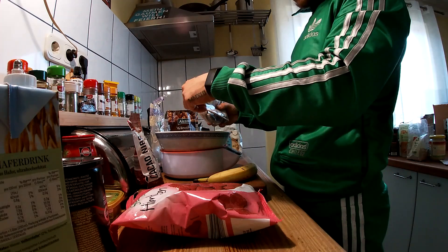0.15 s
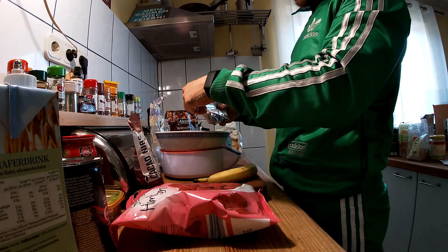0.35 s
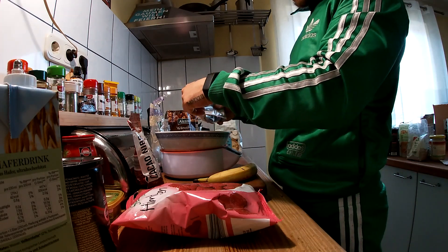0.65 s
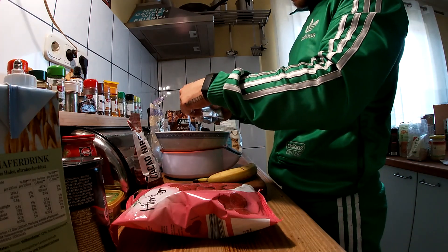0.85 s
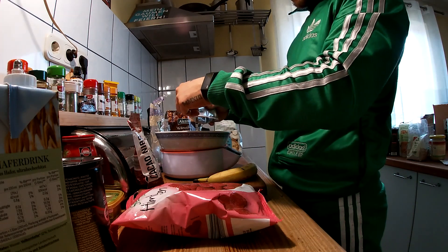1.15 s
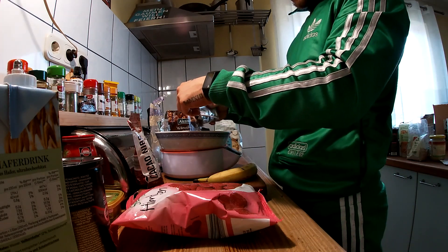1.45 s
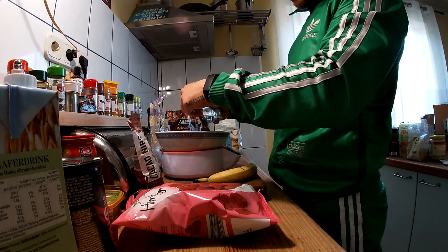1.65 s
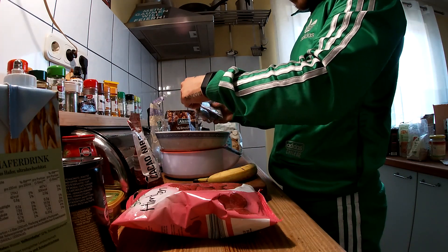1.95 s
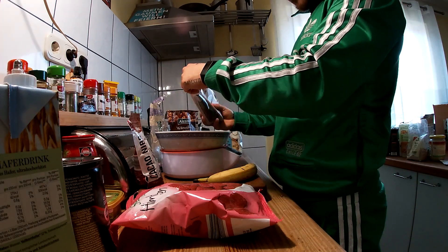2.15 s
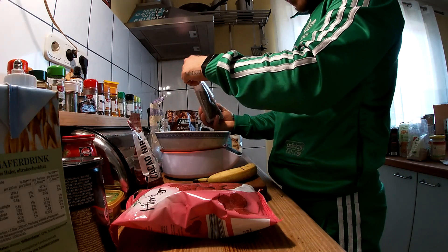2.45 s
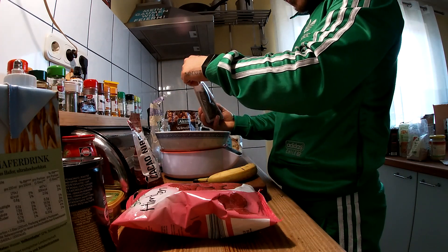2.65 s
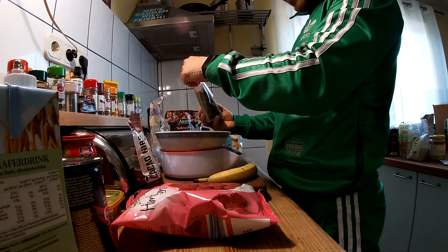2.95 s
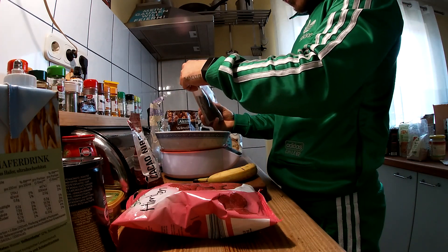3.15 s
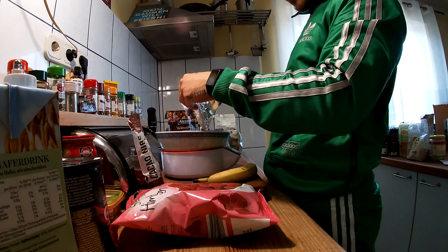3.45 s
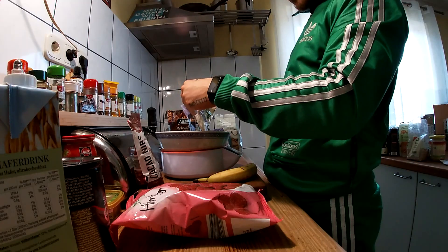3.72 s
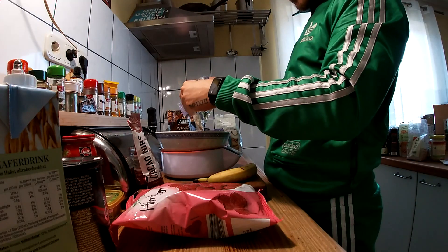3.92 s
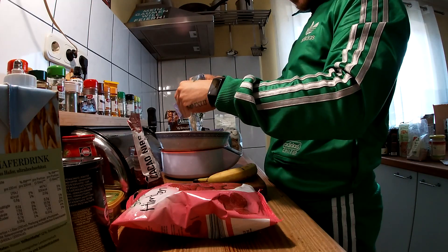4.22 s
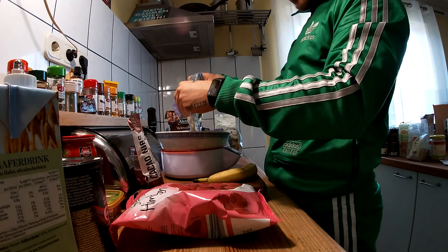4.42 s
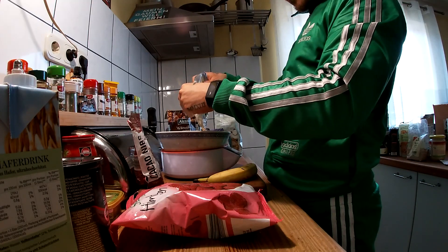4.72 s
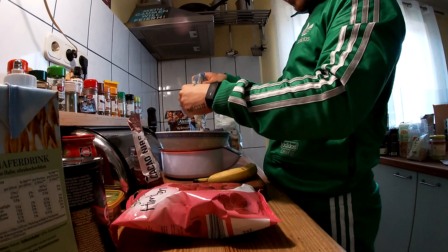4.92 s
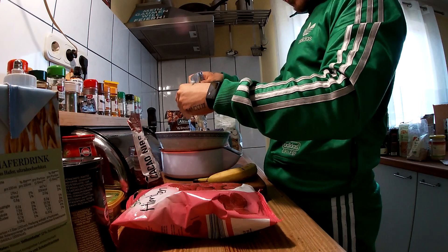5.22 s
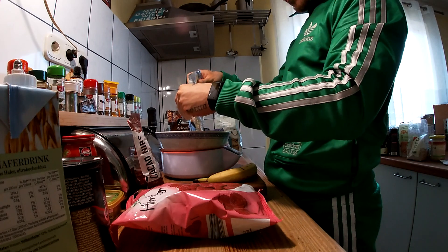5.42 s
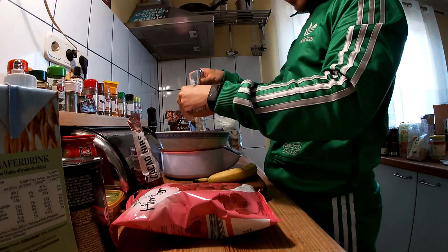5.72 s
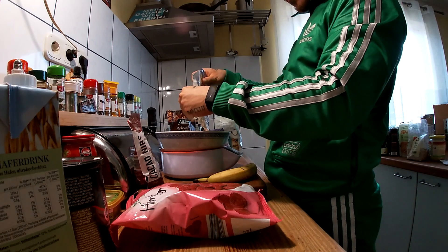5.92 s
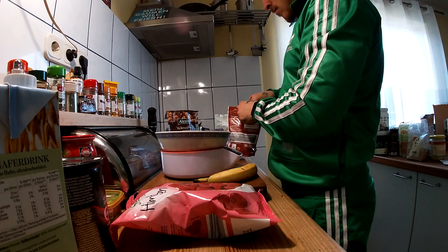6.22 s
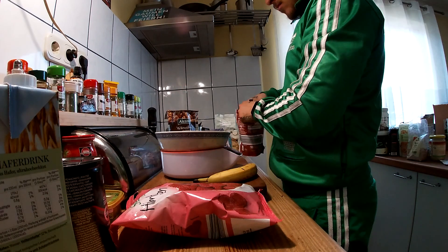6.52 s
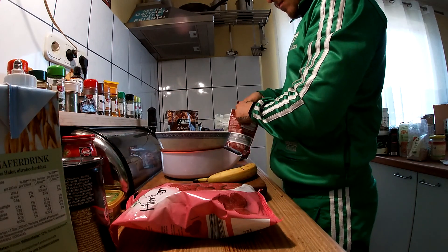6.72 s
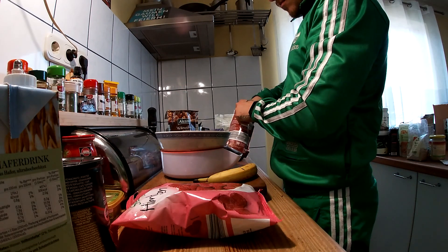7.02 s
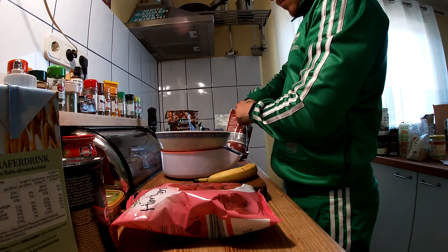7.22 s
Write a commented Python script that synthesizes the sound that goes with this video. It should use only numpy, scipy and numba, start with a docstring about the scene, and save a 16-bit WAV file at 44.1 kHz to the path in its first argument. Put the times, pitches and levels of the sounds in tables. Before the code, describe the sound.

Grains pour in rattling rushes with light packet knocks, a brief silent gap midway, then sharp snapping and crinkling of a stiff bag.

```python
"""Dry oats, seeds and nuts slide out of thin packets into a bowl in a small tiled kitchen; at the end a stiff
film bag is worked open close to a single microphone. Grains and film are clouds of short random rings; each snap
is an abrupt crack and a run of ticks; fingers knock packet and worktop, whose modes ring; scuffs and thuds are
low rings; the room is a hush, hard echoes and a tail. An edit leaves a tenth of a second of silence in the middle."""
import sys
import numpy as np
from scipy import signal
from scipy.fft import rfft, irfft
from scipy.io import wavfile
from numba import njit

SR = 44100
rng = np.random.default_rng(int(sys.argv[2]) if len(sys.argv) > 2 else 0)


def voltage_ratio(level):
    """Linear amplitude factor for a level in decibels (scalar or array-like)."""
    return 10 ** (np.asarray(level, float) / 20)


def persist_wave(psi):
    """Save psi, clipped to +-1, as 16-bit WAV."""
    counts = np.round(np.clip(psi, -1, 1) * 32767).astype(np.int16)
    wavfile.write(sys.argv[1], SR, np.atleast_2d(counts).T)


N = 325017  # samples


@njit
def rings(s, hz, t60, size, count):
    """Each contact starts a decaying sine that stops once it has lost 60 dB."""
    out = np.zeros(count)
    for k in range(len(s)):
        turn = np.exp((2j * np.pi * hz[k] - np.log(1000) / t60[k]) / SR)
        z, start = size[k] + 0j, int(s[k] * SR)
        for j in range(start, min(count, start + int(t60[k] * SR))):
            out[j] += z.imag
            z *= turn
    return out


def small(x, low_hz):
    """Small things radiate little bass."""
    return signal.sosfilt(signal.butter(2, low_hz, "high", fs=SR, output="sos"), x)


def rustle(curve, sizes):
    """Random contacts of each size: many faint, a few strong; smaller pieces ring higher. One track per spot."""
    clumps_per_s, clump_db = 30, 1.36  # pieces let go in clumps, so all sizes swell and dip together
    # one piece rattles several times near its own pitch; spread is the share of the range it covers
    pieces_per_s, piece_db, piece_spread = 90, 1.5, 0.662
    s, *levels = np.transpose(curve)
    out = np.zeros((len(SPOT_SHIFT_MS), N))
    clumps = clump_db * rng.standard_normal(N // 500)
    for db, (rate, low_hz, high_hz, cycles, scatter_db, lean) in zip(levels, sizes):
        length = s[-1] - s[0]
        when, pitch, luck, side = rng.random((int(rate * length), 4)).T
        when = s[0] + when * length
        piece = (when * pieces_per_s).astype(int)
        own_pitch, own_luck = rng.random((N // 200, 2))[piece].T
        # pitches that run past the end of the range fold back
        pitch = np.abs((2 * own_pitch + piece_spread * pitch) % 2 - 1)
        hz = low_hz + (high_hz - low_hz) * pitch ** lean
        t60 = 2 * cycles / hz
        size = voltage_ratio(-scatter_db * np.log(1.003 - luck)) * np.sign(side - .5) / np.sqrt(t60)
        # a ring of size a holds the energy a^2 t60 / (4 ln 1000)
        unit = np.sqrt(rate * np.mean(size ** 2 * t60) / (4 * np.log(1000)))
        swell_db = np.interp(when * clumps_per_s, range(len(clumps)), clumps)
        level_db = np.interp(when, s, db) + 2 * piece_db * (own_luck - .5) + swell_db
        size = size * voltage_ratio(level_db) / unit
        for k in range(len(out)):
            own = [v[k::len(out)].copy() for v in (when, hz, t60, size)]
            out[k] += small(rings(*own, count=N), 0.74 * low_hz)
    return out


def swells(t, events, rise_s, fall_s):
    """Bell-shaped changes of level in dB, each with its own time scale before and after the peak."""
    s, db = np.transpose(events)[:, :, None]
    return np.sum(db * np.exp(-((t - s) / np.where(t < s, rise_s, fall_s)) ** 2), axis=0)


def sizes_db(curve, dull_db, events=None):
    """Levels of fine, middling and dull contacts from one level and the share of larger pieces."""
    s, fine_db, larger_db = np.transpose(curve)
    t = np.arange(s[0], s[-1], .002)
    fine = np.interp(t, s, fine_db)
    if events:
        fine = fine + swells(t, events, rise_s=0.018, fall_s=0.025)
    middling = fine + np.interp(t, s, larger_db)
    return np.transpose([t, fine, middling, middling + dull_db])


# the stream of grains; it dies away, and runs again after the silence, before room and microphone:
# [t/s, level of fine ticks/dB, level of larger pieces/dB over the fine]
POUR = [(0, -60, 13.5), (.05, -65.5, 8), (.056, -45.5, -7.5), (.3, -45, -7.5), (.45, -48.5, -7),
        (1.0, -49.5, -7.5), (1.3, -47.5, -12), (1.7, -46.5, -12), (1.85, -51, -25), (2.1, -63.5, -8.5),
        (2.55, -59, -7), (2.9, -70.5, -22), (3.1, -82.5, -7), (3.39, -78, -7), (3.394, -42.5, -8.5),
        (3.75, -45, -7), (3.95, -52, -4.5), (4.35, -51.5, -4.5), (4.6, -49, -5.5), (4.95, -53.5, -4.5),
        (5.4, -53.5, -4), (5.66, -47.5, -3), (6.05, -50, -3), (6.135, -62, 10.5), (6.2, -101, -2)]
# shakes of the packet raise, or now and then lower, the level of the grains: [t/s, level change/dB]
PACKET_SHAKES = [(.125, 6.5), (.335, 6), (.485, 3.5), (.66, 4.5), (.73, 2.5), (.83, 5.5), (0.904, 8),
                 (1.0, 5), (1.07, 1), (1.23, 7), (1.55, 0), (1.62, -2), (1.7, 2), (2.36, 12), (2.45, 6),
                 (2.62, 5), (2.754, 19.5), (2.965, 7), (3.258, 15.5), (3.57, 1), (3.81, 1), (4.005, 4),
                 (4.08, 3.5), (4.23, 9.5), (4.415, 3.5), (5.1, 4.5), (5.28, 4.5), (5.46, 2.5)]
# a row each for fine, middling and dull contacts: [contacts per s, lowest f/Hz, highest f/Hz,
# cycles of ring to the 30 dB point, mean scatter/dB, lean to low pitch (exponent)]
GRAIN_SIZES = [(3025, 2833, 10020, 2.6, 2.5, 0.96), (1472, 1086, 3910, 3.84, 2.5, 0.53),
               (398, 129, 918, 7.8, 3, 1.526)]


def grains():
    """Oats, seeds and nuts tick as they slide and land, over dull bumps of the larger pieces."""
    return rustle(sizes_db(POUR, dull_db=-14.5, events=PACKET_SHAKES), GRAIN_SIZES)


def colour(x, points):
    """Causal filter through (f/Hz, level/dB) points, from the cepstrum of the log gain."""
    hz, db = np.transpose(points)
    f = np.maximum(np.fft.rfftfreq(4096, 1 / SR), 1)
    cepstrum = irfft(np.interp(np.log(f), np.log(hz), db) * np.log(10) / 20)
    # folding the later half onto the first leaves no response ahead of the sound
    cepstrum[1:len(cepstrum) // 2] *= 2
    cepstrum[len(cepstrum) // 2 + 1:] = 0
    return signal.fftconvolve(x, irfft(np.exp(rfft(cepstrum))))[:len(x)]


# spectrum of the hush, of which only the shape counts: [f/Hz, relative level/dB]
HUSH = [(12, -41.5), (20, 2.5), (53, -24), (172, -6), (234, -6.5), (277, -17), (301, -10), (377, -7.5),
        (558, -15.5), (949, -9), (1090, -16.5), (7950, -21.5), (16000, -63.5)]


def kitchen():
    """Faint steady hush of the room and the microphone, as coloured noise."""
    hush = colour(rng.standard_normal(N), HUSH)
    return voltage_ratio(-68.5) * hush / np.std(hush)


# blows on packet, bowl and worktop, and short 1900 Hz rings of the bag as it is gripped; a blow that rings
# at several pitches has several rows; levels come before modes, room and microphone:
# [t/s, level/dB, f that rings most/Hz, level lost per octave away from it/dB]
BLOWS = [(.024, -49.5, 900, 5.5), (.035, -50, 800, 6), (.09, -48.5, 170, 3), (.206, -46, 640, 3.5),
         (.226, -40, 400, 15), (.269, -45, 200, 9), (.516, -52, 380, 14), (.69, -58, 800, 4.5),
         (.703, -46.5, 380, 13), (.957, -52, 810, 3.5), (1.047, -45.5, 400, 8.5), (1.227, -51, 400, 9.5),
         (1.398, -48.5, 373, 10.5), (1.575, -53, 373, 12), (1.707, -54, 790, 6), (1.75, -50.5, 386, 18),
         (2.239, -44.5, 420, 22), (2.239, -50.5, 850, 17), (2.24, -52, 1950, 5), (2.331, -42, 540, 13),
         (2.338, -45.5, 300, 6.5), (2.513, -61, 750, 5), (2.736, -33.5, 165, 7.5), (2.737, -41, 640, 26),
         (3.492, -47, 163, 4.5), (3.934, -51, 283, 10), (5.377, -40, 642, 48.5), (5.378, -52.5, 1320, 8.5),
         (5.602, -43.5, 293, 8), (6.1, -50.5, 500, 14), (6.11, -39.5, 170.6, 14), (6.171, -37.5, 515, 17),
         (6.245, -53, 1900, 14), (6.254, -49.5, 1900, 15), (6.265, -47.5, 1900, 19), (6.279, -38, 540, 12),
         (6.2795, -44, 1920, 6), (6.296, -50, 1900, 14), (6.421, -31, 500, 9), (6.48, -26, 480, 12),
         (6.529, -29, 560, 4.5), (6.755, -33.5, 570, 11), (6.862, -27, 554, 7), (6.944, -27, 440, 14),
         (7.339, -32.5, 696, 35)]
# modes that the blows set ringing: [f/Hz, level/dB, t60/s]
MODES = [(155.7, 3.5, 0.11), (222, -3.5, 0.073), (284, -3.5, 0.11), (420, 3, 0.041), (498, 8, 0.0088),
         (629.4, 4.5, 0.057), (707, 0.5, 0.094), (840, 4, 0.053), (1300, 8.5, 0.03), (1883, 15, 0.018)]


def knocks(count):
    """The pitch of a blow decides which modes answer: those near it most, each as a few uneven rings."""
    stray, late_ms, rebound_db = 0.043, 4, 7.5  # pitch scatter, mean lateness of rebounds, loss per rebound
    s, db, near_hz, narrow_db = np.transpose(BLOWS)[:, :, None, None]
    hz, mode_db, t60 = np.transpose(MODES)
    draws = rng.standard_normal((len(BLOWS), 3, count, len(MODES)))
    detune, side, late = draws.transpose(1, 0, 2, 3)
    rebound = np.arange(count)[:, None]
    level_db = db + mode_db - narrow_db * np.abs(np.log2(hz / near_hz))
    size = voltage_ratio(level_db) * np.sign(side[:, :1]) * voltage_ratio(-rebound_db * rebound)
    when = s + late ** 2 * late_ms / 1000 * (rebound > 0)
    # the first ring strays less than the rebounds
    hz = hz * (1 + stray * detune * np.where(when > s, 1, .4))
    t60, size = t60 + 0 * when, size + 0 * when
    rung = rings(when.ravel(), hz.ravel(), t60.ravel(), size.ravel(), count=N)
    # a soft contact pushes for a moment, which rounds the start
    return signal.sosfilt(signal.butter(1, 2500, fs=SR, output="sos"), rung)


SNAP_MID_HZ = 3530  # the level of a snap applies here
# snaps of film and dropping pieces; a few rows are hard echoes 7 ms after a snap; before room and microphone:
# [t/s, level/dB, brightness/dB per octave, narrowness/dB an octave either side,
# level of the crackle that follows/dB over the snap]
SNAP_ROWS = [(0.132, -43, 14.5, -2, -10), (0.2063, -22, -1.5, 6, -18.5), (0.341, -30, 4.5, 3.5, -21),
             (0.65, -46, 9, 6.5, -24.5), (0.666, -40, 6.5, 5, -20), (.692, -46, -7, 2, -20),
             (0.817, -47, 14.5, -3, -14), (0.8845, -31, -5, 11, -25), (.957, -45, 4, 9, -25),
             (1.0463, -30.5, -2, 9, -6), (1.056, -34, 12.5, 0.5, -15), (1.2295, -44.5, 4, -5, -21),
             (1.2359, -39, 15, -4, -23), (1.469, -42, 5.5, -2, -25), (1.709, -42, 1.5, -5, -15),
             (2.24, -37.5, 4, 0, -5), (2.331, -30, 3.5, 1, -9.5), (2.4481, -43, -5, 3, -10.5),
             (2.736, -38.5, 5.5, -0.5, -1), (3.558, -37.5, 6, 4.5, -20), (3.937, -36, -4, 4, -26.5),
             (4.1999, -22, 8.5, 0.5, -10), (4.2066, -24.5, 7, 3, -15), (5.602, -43.5, -3, -1.5, -19),
             (6.1702, -42.5, -8, -1, -24), (6.242, -47.5, 0, -1, -11.5), (6.2554, -41, 2, -1, -18),
             (6.2657, -39.5, 2.5, -2, -2), (6.3142, -27, 6, 6, -10), (6.33, -25.5, 6, -0.5, -16),
             (6.3447, -27.5, 10.5, 1.5, -5.5), (6.406, -17, -0.5, 4.5, -26), (6.4294, -28, -8.5, 0, -5),
             (6.4395, -28.5, -7, 2, -15), (6.445, -19, 8, 11, -26.5), (6.452, -29, 12, 5, -21.5),
             (6.4793, -17, 5.5, -2, -7.5), (6.4862, -19, 1, 3, -12), (6.5255, -18, 5, 0.5, -11.5),
             (6.533, -25.5, -0.5, -3, -17), (6.542, -26, -2, -1, -11), (6.585, -22, 2.5, 6.5, -22),
             (6.61, -22, 2, 1.5, -8), (6.6181, -19.5, 1.5, 3.5, -4), (6.7593, -26.5, 0.5, -0.5, 0),
             (6.8234, -25, 11, 0.5, -2.5), (6.863, -19, -2.5, -1, -12.5), (6.871, -29, -6.5, 2, -17.5),
             (6.898, -35.5, -5, 1.5, -20.5), (6.943, -25, 3, -0.5, 4), (6.948, -22, 2.5, 0.5, -19),
             (6.954, -27, 6, 0, -16), (7.035, -33, -7.5, 5, -18), (7.0424, -14, -1.5, 8, -7.5),
             (7.051, -21, -6, 10, -22), (7.1314, -35.5, 1.5, 0, 11), (7.139, -26, -0.5, -0.5, -10),
             (7.208, -28.5, -2, 1, -8), (7.2145, -25, 5, 1, -12), (7.228, -19, -2, 9, -7),
             (7.233, -27, -1, 3, -11), (7.239, -20.5, 2, 2.5, -6), (7.253, -31, 9, -0.5, -18),
             (7.281, -29, -5, 1.5, 4.5), (7.295, -31, -4, 1, -10), (7.3595, -28, 5.5, -0.5, -22)]


def cracks(count, steps, ms, cycles, step_db):
    """The sharp start of a snap: a few abrupt steps, each striking a whole set of short rings at once."""
    s, level_db, bright_db, narrow_db = np.transpose(SNAP_ROWS)[:-1, :, None, None]
    late, side = rng.random((len(SNAP_ROWS), 2, steps, 1)).transpose(1, 0, 2, 3)
    luck = rng.standard_normal((len(SNAP_ROWS), steps, count))
    ring, step = np.arange(count), np.arange(steps)[:, None]
    hz = 1050 * 2 ** (ring / count * 3.3) + 0 * luck
    octaves = np.clip(np.log2(hz / SNAP_MID_HZ), -1.5, 1.2)
    db = level_db + bright_db * octaves - narrow_db * octaves ** 2 - step_db * step + 1.74 * luck
    # the crack stands 2.5 dB over the level of the snap; neighbouring rings have opposite signs
    size = voltage_ratio(db + 2.5) * (-1.) ** ring * np.sign(side - .5)
    when = s + late * (step > 0) * ms / 1000 + 0 * luck
    ticks = rings(when.ravel(), hz.ravel(), cycles / hz.ravel(), size.ravel(), count=N)
    return small(small(ticks, low_hz=990), low_hz=990)


def snaps(count, size, ms):
    """After a snap the neighbouring creases let go one by one, ever rarer and fainter, in tight clusters of ticks."""
    cluster_ms = 1.6  # spread within one crease
    s, level_db, bright_db, narrow_db, crackle_db = np.transpose(SNAP_ROWS)[:, :, None]
    which, pitch, side, luck = rng.random((len(SNAP_ROWS), 4, count)).transpose(1, 0, 2)
    crease = (which * size).astype(int)
    late = np.take_along_axis(rng.random((len(SNAP_ROWS), size)), crease, axis=1)
    hz = 1050 * 2 ** ((np.arange(count) + pitch) / count * 3.46)
    octaves = np.clip(np.log2(hz / SNAP_MID_HZ), -1.2, 1.05)
    db = level_db + bright_db * octaves - narrow_db * octaves ** 2
    strength = voltage_ratio(db + crackle_db - 5 * late - 7.6 * luck) * np.sign(side - .5)
    when = s + (cluster_ms * (1 + pitch) - ms * np.log(1.02 - late)) / 1000
    ticks = rings(when.ravel(), hz.ravel(), 13.5 / hz.ravel(), strength.ravel(), count=N)
    return small(small(ticks, low_hz=990), low_hz=990)


# a packet settles on the worktop, before room and microphone: [t/s, level/dB]
SETTLE = [(2.74, -56), (2.8, -56), (2.87, -71), (2.92, -85.5)]
# a packet drags on the worktop, before room and microphone: [t/s, level/dB]
DRAG = [(6.04, -63), (6.085, -52), (6.115, -50), (6.16, -53), (6.2, -73)]
# one size of contact: [contacts per s, lowest f/Hz, highest f/Hz,
# cycles of ring to the 30 dB point, mean scatter/dB, lean to low pitch (exponent)]
SCUFF_SIZES = [(500, 126, 1070, 3.7, 3, 1.3)]


def scuffs():
    """A packet drags or settles on the worktop in a dull patter of contacts."""
    return sum(rustle(curve, SCUFF_SIZES).sum(axis=0) for curve in (SETTLE, DRAG))


# handling felt through the worktop: [t/s, level/dB over the steady tremble]
SHOVES = [(6.083, 19.5), (6.428, 25), (6.626, 21), (6.778, 32.5), (6.884, 29.5), (6.97, 17), (7.074, 20),
          (7.192, 18)]
# one size of contact: [contacts per s, lowest f/Hz, highest f/Hz,
# cycles of ring to the 30 dB point, mean scatter/dB, lean to low pitch (exponent)]
TREMBLE_SIZES = [(61.4, 90, 225, 1.7, 1.4, 0.57)]


def thuds():
    """The worktop trembles under the hands and passes on each shove."""
    tremble_db, rise_s, fall_s = -75.5, .035, 0.068
    t = np.arange(SHOVES[0][0] - rise_s, N / SR, .002)
    level_db = tremble_db + swells(t, SHOVES, rise_s, fall_s)
    return rustle(np.transpose([t, level_db]), TREMBLE_SIZES).sum(axis=0)


# air and panels of the stiff bag, before the mix with the plain sound: [f/Hz, width/Hz, level/dB]
BAG_MODES = [(154.6, 20, 6), (482, 94, 10), (658, 97, 7.5), (1230, 350, -5.5), (1950, 410, -4),
             (3160, 320, -0.5)]


def bag(x):
    """The stiff bag lends its resonances to whatever crackles on it, from the moment it is gripped."""
    grab_s = 6.243
    rung = sum(voltage_ratio(db) * signal.lfilter(*signal.iirpeak(hz, hz / width, SR), x) for hz, width, db in BAG_MODES)
    return np.where(np.arange(N) / SR < grab_s, x, 0.75 * x + 0.64 * rung)


# fingers working the stiff bag, before its resonances, room and microphone:
# [t/s, level of fine crackle/dB, level of larger folds/dB over the fine]
WORKING = [(6.243, -50, 0), (6.374, -45.5, 0.5), (6.436, -35.5, -1), (6.494, -31, -7.5),
           (6.624, -41.5, 0.5), (6.72, -49, 8.5), (6.77, -37, -1), (6.824, -45.5, 5.5), (6.93, -49, 9),
           (7.0, -48, 7), (7.115, -49.5, 9.5), (7.19, -40, -2), (7.37, -42.5, 0.5)]
# a row each for fine, middling and dull folds: [contacts per s, lowest f/Hz, highest f/Hz,
# cycles of ring to the 30 dB point, mean scatter/dB, lean to low pitch (exponent)]
FOLD_SIZES = [(2900, 3740, 5760, 5, 5.5, 1.45), (1220, 1190, 4500, 0.73, 1.5, 2.1),
              (400, 144.5, 904, 4.7, 2.38, 1.545)]


def film():
    """Stiff film crackles in fine creases and larger, duller folds, which ring the bag."""
    return bag(rustle(sizes_db(WORKING, dull_db=-1.5), FOLD_SIZES))


# nearest walls, before each source's own trim: [delay/ms, level/dB against the direct sound]
WALLS = [(2.4, -9.5), (4.8, -16.5), (6.8, -7.5), (7.5, -11), (9.6, -14), (14.5, -30.5)]
# reverberant tail in octave bands, before each source's own trim: [f/Hz, t60/s, level/dB]
REVERB = [(122.4, 0.24, -25), (251.4, 0.41, -24), (452, 0.59, -34), (1002, 1, -34), (1786, 0.52, -30.5),
          (3880, 0.57, -35), (8400, 0.37, -29), (14500, 0.18, -26)]


def room(x, shift_ms, echo_db=0, tail_db=0):
    """Direct sound, a few hard echoes off the tiles, then a tail that fades octave by octave."""
    t = np.arange(SR // 2) / SR
    answer = 1. * (t == 0)
    for ms, db in WALLS:
        answer[int((ms + shift_ms) * SR / 1000)] += voltage_ratio(db + echo_db)
    for hz, t60, db in REVERB:
        edges = [hz / np.sqrt(2), min(hz * np.sqrt(2), .45 * SR)]
        octave = signal.butter(2, edges, "band", fs=SR, output="sos")
        band = signal.sosfilt(octave, rng.standard_normal(len(t)))
        answer += voltage_ratio(db + tail_db - 60 * t / t60) * band * np.clip(t / 0.013, 0, 1)
    # the whole answer has unit energy
    return signal.fftconvolve(x, answer / np.sqrt(np.sum(answer ** 2)))[:N]


# each spot in packet and bowl has its own path to the walls: one shift of the echoes per spot [ms]
SPOT_SHIFT_MS = (0.0351, -0.946, 0.596, -0.359, 1.07)


def spots_in_room(spots):
    """Each spot sounds in the room with its own echo times."""
    return sum(room(x, shift_ms) for x, shift_ms in zip(spots, SPOT_SHIFT_MS))


# tone of the microphone: [f/Hz, level/dB]
MIC_TONE = [(30, -19.5), (90, -45), (140, -8.5), (7500, 4), (8800, 1), (10000, -7), (11500, -15.5),
            (14000, -12.5), (17000, -24.5)]


def microphone(x):
    """The microphone lends its own tone to what reaches it."""
    return colour(x, MIC_TONE)


def widen(x):
    """The highest treble is smeared one way on the left and the opposite way on the right."""
    smear = rng.standard_normal(256)
    top = signal.sosfilt(signal.cheby2(10, 40, 11100, "high", fs=SR, output="sos"), x)
    side = voltage_ratio(-5) * signal.fftconvolve(top, smear / np.sqrt(len(smear)), "same")
    return np.array([x + side, x - side])


def scene():
    """Grains, film, snaps and blows in the kitchen, heard by the microphone."""
    spots = grains() + film()
    spots[2] += bag(snaps(count=90, size=14, ms=17))  # ms: mean wait of neighbouring creases
    heard = spots_in_room(spots)
    # a snap is nearer than the walls
    breaks = cracks(count=16, steps=3, ms=1.8, cycles=11, step_db=5.5)
    heard = heard + room(breaks, 0, echo_db=-2.5, tail_db=-2.5)
    # blows and scuffs have weaker echoes and a weaker tail
    heard = heard + room(knocks(count=3) + scuffs(), 0, echo_db=-8, tail_db=-8)
    return widen(microphone(heard) + thuds() + kitchen())


def low_pass(x):
    """Removes everything above the highest recorded frequency."""
    return signal.sosfilt(signal.butter(12, 15790, fs=SR, output="sos"), x)


def record(dry):
    """The edit fades out and in around the silence; a short fade out and in marks a cut at 0.051 s."""
    mute_start_s, mute_end_s, cut_s, fade_s = 3.390, 3.489, 0.051, 0.0031
    t = np.arange(N) / SR
    fader = np.clip(np.maximum(mute_start_s - t, t - mute_end_s) / fade_s, 0, 1)
    fader *= np.clip(np.abs(t - cut_s) / fade_s, 0, 1)
    return low_pass(dry * fader)


dry = scene()
out = record(dry)
persist_wave(out)
```